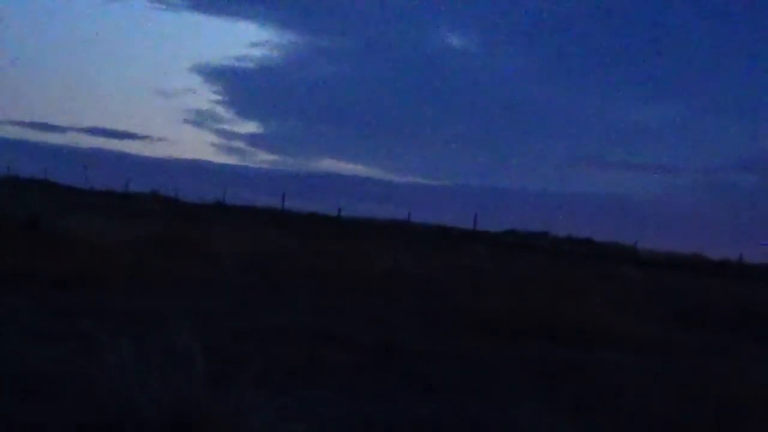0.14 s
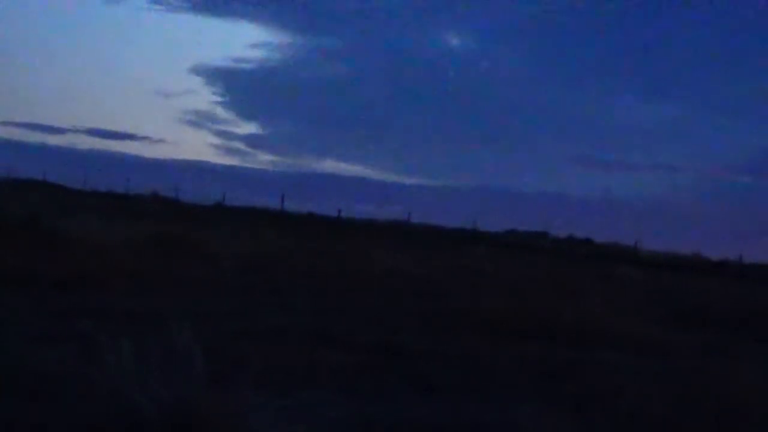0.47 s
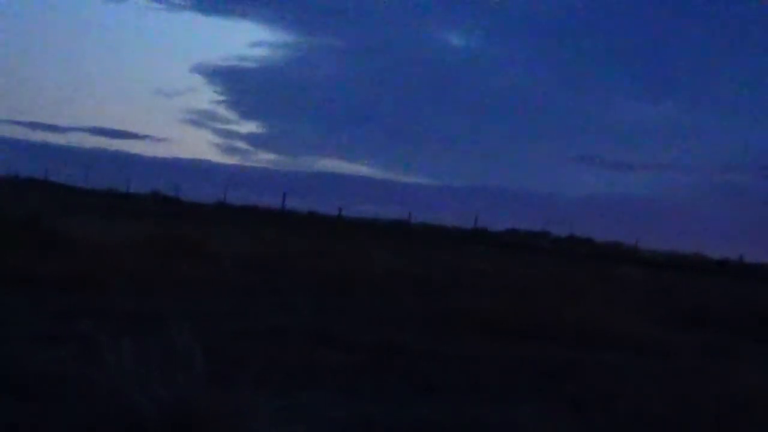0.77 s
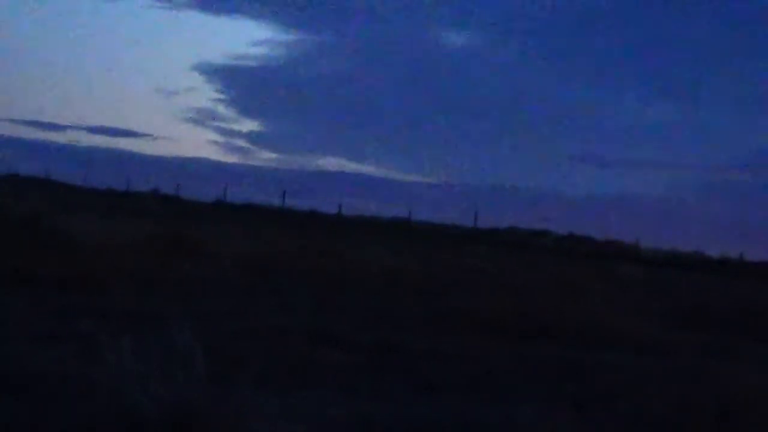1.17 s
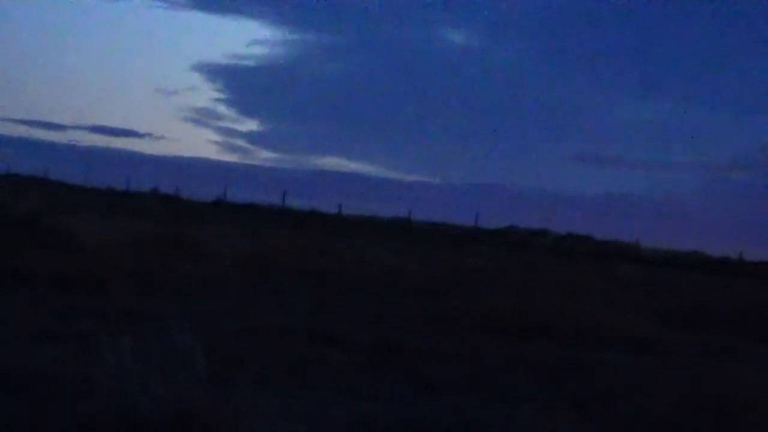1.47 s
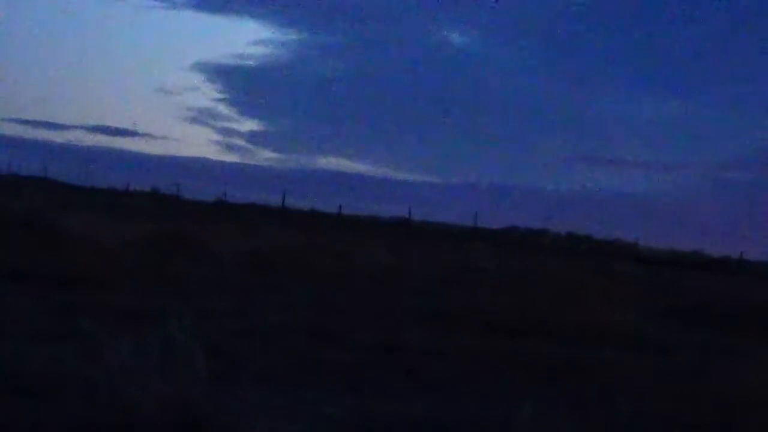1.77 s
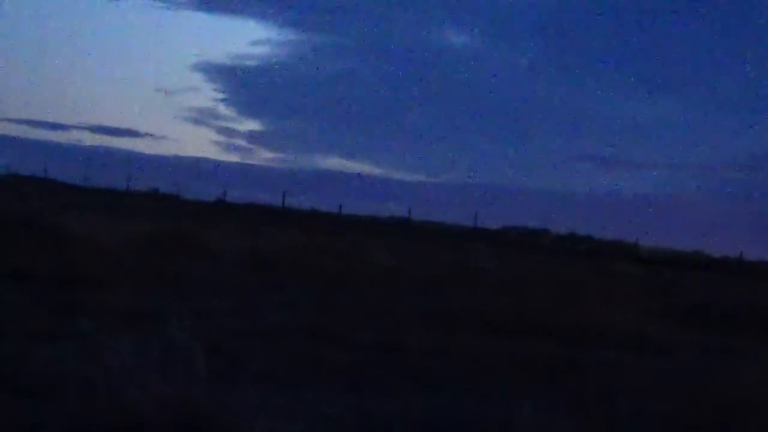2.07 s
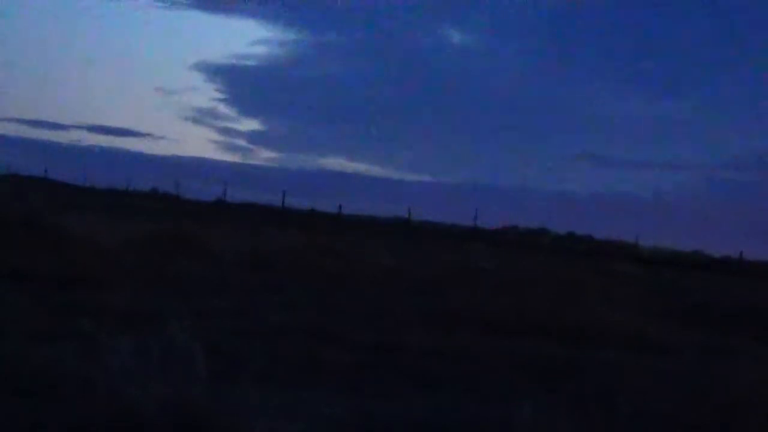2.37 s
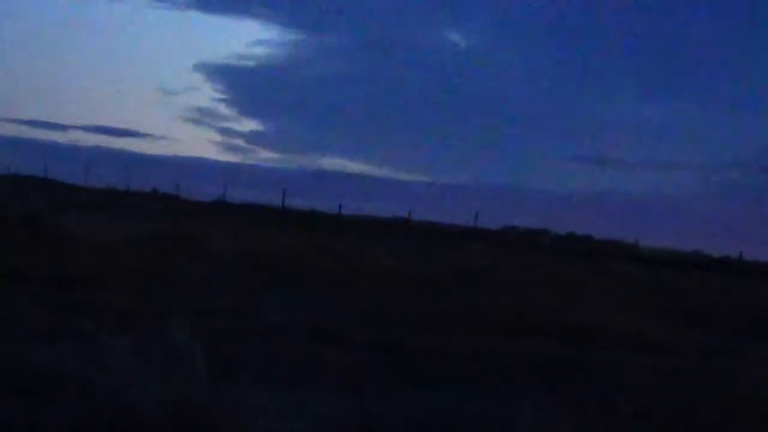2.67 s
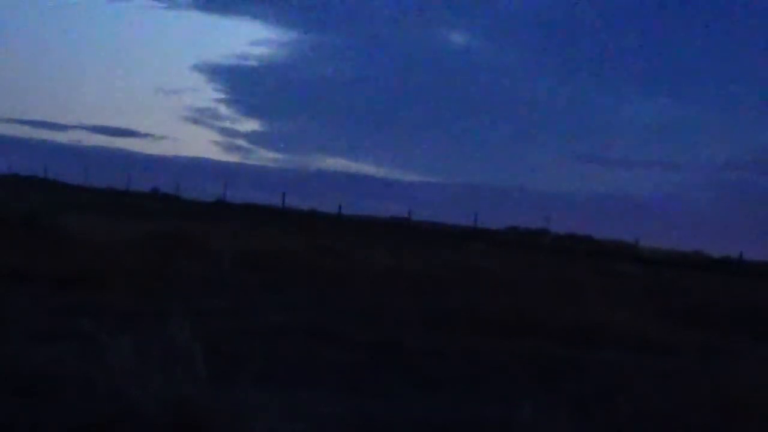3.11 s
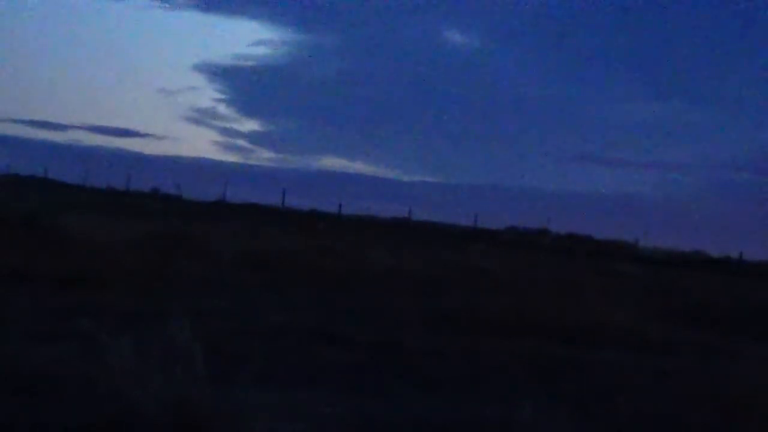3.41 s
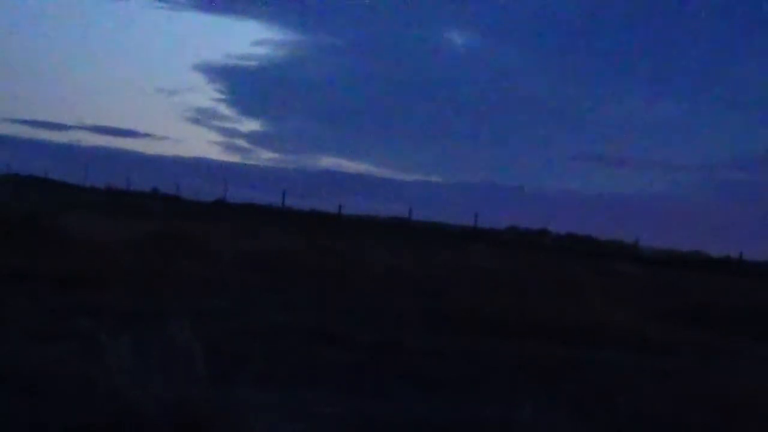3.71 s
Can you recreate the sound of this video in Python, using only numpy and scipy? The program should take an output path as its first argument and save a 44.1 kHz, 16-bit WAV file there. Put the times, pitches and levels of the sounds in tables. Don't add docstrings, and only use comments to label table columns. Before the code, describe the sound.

Coyotes yip and howl in short wavering cries across an open field, dry clicks close by.

```python
import sys
import numpy as np
from scipy import signal
from scipy.fft import rfft, irfft
from scipy.io import wavfile
from scipy.ndimage import uniform_filter1d

SR = 44100
rng = np.random.default_rng(int(sys.argv[2]) if len(sys.argv) > 2 else 0)


def voltage_ratio(level):
    return 10 ** (np.asarray(level, float) / 20)


def file_out(sig):
    cols = np.atleast_2d(sig).T
    lim = np.clip(cols, -1, 1)
    pcm = np.round(lim * 32767).astype(np.int16)
    wavfile.write(sys.argv[1], SR, pcm)


N = 169785


def evened(x):
    return x / np.sqrt(np.mean(x ** 2) + 1e-20)


def read(points, hz):
    f, value = np.transpose(points)
    return np.interp(np.log(hz + 1), np.log(f + 1), value)


def along(points, t):
    return np.interp(t, *np.transpose(points))


def add(mix, start_s, sound, side_db):
    part = mix[:, round(start_s * SR):][:, :sound.shape[-1]]
    lean = voltage_ratio(np.array([[side_db / 2], [-side_db / 2]]))
    part += sound[..., :part.shape[1]] * 2 * lean / lean.sum()


def drift(count, span_s):
    size = int(span_s * SR) + 1
    smooth = uniform_filter1d(rng.standard_normal(count), size)
    return evened(uniform_filter1d(smooth, size))


def ring(x, peaks):
    out = 0
    for hz, width_hz, db in peaks:
        r = np.exp(-np.pi * width_hz / SR)
        poles = [1, -2 * r * np.cos(2 * np.pi * hz / SR), r * r]
        out = out + voltage_ratio(db) * signal.lfilter([1 - r, 0, r - 1], poles, x)
    return out


def colour(x, points):
    hz = np.fft.rfftfreq(N, 1 / SR)
    gain_db = read(points, hz) - 60 * (hz < points[0][0] / 2)
    return irfft(rfft(x) * voltage_ratio(gain_db), N)


def glide(start_s, length_s, db, first_hz, last_hz):
    u = np.linspace(0, 1, int(length_s * SR))
    hz = (first_hz + (last_hz - first_hz) * u) * (1 + 0.011 * drift(len(u), 0.0089))
    tone = np.sin(2 * np.pi * np.cumsum(hz) / SR)
    return start_s, voltage_ratio(db) * 2 * np.sin(np.pi * u) * tone


def air():
    # (frequency [Hz], level [dB])
    hiss_spectrum = [(24, -62), (100, -27.5), (400, -8.5), (1730, -5), (4500, -15.5), (8060, -18.5),
                     (10900, -15), (11300, -56)]
    # (frequency [Hz], left over right [dB])
    side_lean = [(60, -11.5), (850, 6), (12100, -0.5)]
    hz = np.fft.rfftfreq(N, 1 / SR)
    a, b = rfft(colour(rng.standard_normal((2, N)), hiss_spectrum))
    same = np.clip(0.89 - 0.17 * np.log(1 + hz / 200), 0, 1)
    lean = voltage_ratio(read(side_lean, hz) / 2)
    left = a * lean
    right = (same * a + np.sqrt(1 - same ** 2) * b) / lean
    return voltage_ratio(-54 + 1.7 * drift(N, 0.027)) * evened(irfft([left, right], N))


def wind():
    # (time [s], level [dB])
    wind_level = [(0, -55.5), (.1, -66), (.3, -66), (.48, -60), (.9, -88), (1.2, -80), (1.3, -59),
                  (1.39, -48.5), (1.5, -61), (1.64, -67), (1.86, -59), (2.1, -70.5), (2.33, -59.5),
                  (2.48, -75.5), (2.7, -60), (2.85, -74), (3.85, -75)]
    # (frequency [Hz], level [dB])
    gust_spectrum = [(30, -15), (140, -6), (450, -16)]
    # (time [s], length [s], level [dB], first pitch [Hz], last pitch [Hz])
    puff_rows = [
        (0.126, .03, -66, 110, 90),
        (0.202, .016, -54, 324, 290),
        (0.551, 0.013, -56.5, 483, 463),
        (1.39, 0.027, -48, 150, 131),
        (1.454, 0.015, -49, 200, 171),
        (1.676, 0.03, -55, 170, 110),
        (3.746, 0.013, -56, 450, 400),
    ]
    z = rng.standard_normal((3, N))
    both = z[:1] + 0.53 * z[1:]
    level = voltage_ratio(along(wind_level, np.arange(N) / SR) + 4.04 * drift(N, 0.028) - 2.0)
    out = evened(colour(both, gust_spectrum + [(1200, -45)])) * level
    for row in puff_rows:
        add(out, *glide(*row), side_db=0)
    return out


def rustle():
    # (time [s], level [dB])
    rustle_level = [(0, -78), (.3, -59.5), (.35, -49.5), (.4, -56.5), (.5, -49), (.6, -75), (1.15, -63.5),
                    (1.72, -75.5), (1.82, -48.5), (1.94, -50), (2.01, -56.5), (2.12, -52.5), (2.32, -52),
                    (2.48, -64), (3.25, -81), (3.42, -58.5), (3.85, -67.5)]
    # (frequency [Hz], level [dB])
    grass_spectrum = [(600, -15), (1200, 0), (2800, -2.5), (4800, -8.5), (7000, -4.5), (10800, -14.5),
                      (11300, -49)]
    cracks_per_s, spread_db, decay_s = 1100, 3, 0.00081
    size = voltage_ratio(spread_db * np.minimum(rng.exponential(1, N), 4))
    size = size * (rng.random(N) < cracks_per_s / SR)
    envelope = np.sqrt(signal.lfilter([1], [1, -np.exp(-1 / (decay_s * SR))], size ** 2))
    grain = rng.standard_normal((3, N))
    both = envelope * (grain[:1] + .5 * grain[1:])
    level = voltage_ratio(along(rustle_level, np.arange(N) / SR) + 6 + 2.84 * drift(N, 0.023))
    return evened(colour(both, grass_spectrum)) * level * voltage_ratio(np.array([[1.5], [-1.5]]))


def clicks(rows, body, burst_s, gain_db, tail_db, lean_db, low_hz):
    # (centre [Hz], width [Hz], level [dB])
    hollow_peaks = [(1102, 77, 1)]
    out = np.zeros((2, N))
    t = np.arange(2500) / SR - .0008
    high_pass = signal.butter(3, low_hz, "high", fs=SR, output="sos")
    for start_s, db, *ring_db in rows:
        z = rng.standard_normal((3, len(t)))
        decay = np.exp(-t / burst_s) + voltage_ratio(tail_db) * np.exp(-t / 0.0076)
        burst = (z[0] + 0.56 * z[1:]) * decay * (t > 0)
        burst[:, np.argmax(t > 0)] += 4
        spot = 1 + np.array([.07, 0, .15]) * rng.standard_normal((len(body), 3))
        sound = signal.sosfilt(high_pass, ring(burst, np.array(body) * spot))
        sound = sound / abs(sound).max()
        if ring_db:
            hollow = ring(burst, hollow_peaks)
            sound = uniform_filter1d(sound, size=5) + voltage_ratio(ring_db[0]) * hollow / abs(hollow).max()
        add(out, start_s, voltage_ratio(db + gain_db) * sound, lean_db)
    return out


def ticks():
    # (time [s], peak [dB])
    tick_rows = [(.0438, -44), (.6708, -33.5), (1.0917, -23.5), (1.255, -42), (1.3823, -43), (1.3905, -35),
                 (1.5796, -31.5), (1.7916, -17.5), (1.7968, -28), (1.801, -22), (1.824, -35),
                 (1.837, -26.5), (1.8456, -28), (1.893, -39), (1.926, -12), (2.0322, -30.5), (2.0631, -38),
                 (2.0848, -27.5), (2.1175, -31.5), (2.1816, -26), (2.2088, -42), (2.2861, -33),
                 (2.345, -44), (2.3859, -42), (2.4128, -48), (2.8291, -38), (3.1199, -47)]
    # (centre [Hz], width [Hz], level [dB])
    tick_body = [(1540, 540, 7.5), (2920, 1500, 7), (4160, 760, 7), (6800, 4400, -14.5)]
    return clicks(tick_rows, tick_body, burst_s=0.00016, gain_db=5.0, tail_db=-13,
                  lean_db=7.5, low_hz=900)


def snaps():
    # (time [s], peak [dB])
    snap_rows = [(.3183, -13), (.3322, -24), (.3362, -28), (.3495, -28), (.367, -27), (.4232, -31),
                 (.4266, -12), (.4483, -28), (.4508, -22), (.4592, -11), (.4672, -20), (.4705, -28),
                 (.4749, -11), (.478, -20), (.484, -13)]
    # (centre [Hz], width [Hz], level [dB])
    snap_body = [(500, 45, 22.5), (1250, 1160, 4), (2720, 510, 9.5), (6000, 3000, 4.5), (7700, 12000, -2)]
    return clicks(snap_rows, snap_body, burst_s=0.00082, gain_db=3.5, tail_db=-23.0,
                  lean_db=-2.5, low_hz=900)


def knocks():
    # (time [s], peak [dB], hollow ring [dB])
    knock_rows = [
        (3.4375, -9, -12),
        (3.453, -40, 10),
        (3.4735, -36, 7),
        (3.483, -58, 30),
    ]
    # (centre [Hz], width [Hz], level [dB])
    knock_body = [(1350, 580, 8), (2450, 990, -2), (3930, 580, -3)]
    return clicks(knock_rows, knock_body, burst_s=0.00055, gain_db=3.4, tail_db=-14,
                  lean_db=6.5, low_hz=358)


def bark(start_s, length_s, db, throat):
    pitch_hz, rough = 327.7, 0.72
    u = np.linspace(0, 1, int(length_s * SR))
    turns = np.cumsum(pitch_hz * (1 + 0.062 * drift(len(u), 0.0063))) / SR
    pulses = evened(np.diff(turns // 1, prepend=0))
    breath = rng.standard_normal(len(u)) * np.exp(-(turns % 1) / 1.07)
    drive = (1 - rough) * pulses + rough * breath
    voice = evened(ring(ring(drive, throat), throat))
    return start_s, voltage_ratio(db) * voice * np.sin(np.pi * u ** 0.67) * 2.78


def far_voices():
    # (time [s], length [s], level [dB], first pitch [Hz], last pitch [Hz])
    yip_rows = [
        (0.219, 0.029, -53.5, 2620, 2800),
        (0.237, 0.02, -56.5, 3000, 3250),
        (0.257, 0.05, -56, 1980, 1860),
        (0.728, 0.028, -50, 2161, 1710),
        (1.6, 0.025, -45, 2070, 1930),
        (2.45, 0.061, -47, 1430, 1227),
        (2.433, 0.07, -52, 2360, 2124),
        (3.189, 0.28, -64, 640, 606),
        (3.658, 0.016, -59, 960, 900),
        (3.727, .04, -66, 3910, 3900),
    ]
    # (time [s], length [s], level [dB])
    bark_rows = [
        (1.038, .05, -62),
        (1.119, 0.033, -49.5),
        (1.142, 0.023, -50),
        (1.161, 0.02, -48.5),
        (1.18, 0.062, -55),
        (2.631, 0.044, -58),
        (3.045, 0.042, -59),
        (3.08, 0.047, -54.5),
        (3.19, 0.11, -60.5),
        (3.33, 0.16, -57.5),
    ]
    # (centre [Hz], width [Hz], level [dB])
    bark_throat = [(1480, 400, 0), (2130, 380, -1)]
    out = np.zeros((2, N))
    for row in yip_rows:
        add(out, *glide(*row), side_db=11)
    for row in bark_rows:
        add(out, *bark(*row, bark_throat), side_db=11)
    return out


def howl(rows):
    third_level = [(2.2, -21), (2.9, -12.5), (3.6, -10)]
    throat_top_hz, cut_db_per_hz, edge_s = 3860, 0.2, 0.0045
    s, hz, second_db, first_db = np.transpose(rows)
    t = np.arange(s[0], s[-1], 1 / SR)
    pitch_hz = np.interp(t, s, hz) * (1 + 0.0044 * drift(len(t), 0.009))
    phase = 2 * np.pi * np.cumsum(pitch_hz) / SR
    first = np.interp(t, s, first_db)
    second = np.interp(t, s, second_db)
    third = second + along(third_level, t) - cut_db_per_hz * np.maximum(3 * pitch_hz - throat_top_hz, 0)
    tone = 0
    for k, db in enumerate((first, second, third), start=1):
        flutter_db = 2 * drift(len(t), 0.0096)
        tone = tone + voltage_ratio(db + flutter_db) * np.sin(k * phase)
    fade = np.clip(np.minimum(t - s[0], s[-1] - t) / edge_s, 0, 1)
    return s[0], np.sqrt(2) * tone * fade


def howls():
    # (time [s], pitch [Hz], second partial [dB], first partial [dB])
    howl_a = [
        [(.3, 1459, -57, -70), (.33, 1530, -44, -50), (.38, 1775, -44.5, -46), (.43, 1709, -46, -44.5),
         (.445, 1720, -46.5, -49), (.495, 1706, -43, -56)],
        [(.495, 1670, -43, -66), (.515, 1507, -43, -66), (.555, 1717, -41, -54.5), (.575, 1563, -39, -59),
         (.62, 1607, -49, -47.5), (.648, 1743, -39, -45.5), (.68, 1707, -37.5, -43), (.72, 1800, -44, -47.5),
         (.75, 1960, -82, -51)],
    ]
    howl_b = [
        [(.965, 1200, -65, -68), (.98, 1400, -55, -57), (.995, 1750, -47.5, -51.5), (1.015, 1880, -68, -67),
         (1.055, 1790, -49, -65), (1.08, 1830, -58, -54), (1.13, 1920, -58, -49)],
        [(1.21, 1820, -47.5, -68), (1.235, 1830, -58, -72), (1.27, 1880, -73, -62), (1.31, 1825, -51.5, -62),
         (1.33, 1740, -38, -55), (1.347, 1720, -50, -51)],
    ]
    howl_c = [
        [(1.525, 1133, -64, -68), (1.56, 1330, -45, -69), (1.575, 1610, -47, -51), (1.6, 1680, -59, -66)],
        [(1.62, 1506, -49.5, -72), (1.66, 1602, -35.5, -54.5), (1.74, 1720, -40.5, -56),
         (1.81, 1786, -48.5, -70), (1.84, 1820, -66, -53), (1.895, 1740, -44, -51)],
    ]
    howl_d = [
        [(2.105, 1002, -44.5, -62), (2.15, 1204, -38.5, -49.5), (2.185, 1290, -58, -53), (2.2, 1350, -42, -49),
         (2.228, 1441, -43.5, -54), (2.24, 1618, -40, -54), (2.275, 1786, -41.5, -47), (2.31, 1880, -68, -52)],
        [(2.315, 1750, -51, -59), (2.35, 1656, -38.5, -47.5), (2.43, 1711, -38.5, -49.5),
         (2.48, 1741, -36.5, -54), (2.51, 1755, -42, -58), (2.555, 1795, -40, -46), (2.6, 1740, -32.5, -45.5),
         (2.635, 1659, -37.5, -47.5), (2.657, 1560, -40.5, -48)],
    ]
    howl_e = [
        [(2.865, 1096, -63, -76), (2.895, 1150, -38.5, -78), (2.915, 1287, -47, -71), (2.97, 1216, -45.5, -60),
         (3.02, 1312, -42, -55), (3.045, 1403, -36, -47), (3.074, 1443, -37, -47)],
        [(3.066, 1490, -40, -46), (3.085, 1544, -37, -50), (3.15, 1498, -37.5, -51.5),
         (3.205, 1565, -44.5, -50), (3.27, 1491, -43.5, -54)],
    ]
    yodel = [
        [(3.52, 1026, -53.5, -52), (3.56, 1180, -33.5, -63), (3.588, 1250, -59, -66)],
        [(3.58, 1690, -44, -45), (3.615, 1570, -60.5, -54), (3.638, 1600, -43, -44)],
        [(3.632, 1189, -42.5, -61), (3.695, 1408, -37.5, -62), (3.75, 1300, -47, -56.5),
         (3.85, 1328, -40, -63.5)],
    ]
    # (centre [Hz], width [Hz], level [dB])
    rasp_throat = [(3330, 410, 0)]
    out = np.zeros((2, N))
    for rows in howl_a + howl_b + howl_c + howl_d + howl_e + yodel:
        add(out, *howl(rows), side_db=12)
    rasp = bark(start_s=1.355, length_s=0.074, db=-56, throat=rasp_throat)
    add(out, *rasp, side_db=12)
    return out


def field(x):
    t = np.arange(SR) / SR
    sparse = rng.standard_normal((2, SR)) * (rng.random((2, SR)) < .05)
    taps = sparse * voltage_ratio(-60 * t / .6) * (t > .01)
    return signal.fftconvolve(x, taps / np.linalg.norm(taps[0]), axes=1)[:, :N]


def pack():
    out = far_voices() + howls()
    return out + voltage_ratio(-19) * field(out)


def scene():
    near = ticks() + snaps() + knocks()
    return air() + wind() + rustle() + near + pack()


def top_cut(x):
    return signal.sosfilt(signal.butter(12, 12680, fs=SR, output="sos"), x)


def record(dry):
    low_pass = signal.butter(11, 10140, fs=SR, output="sos")
    mix = signal.sosfilt(low_pass, dry)
    return top_cut(mix)


dry = scene()
out = record(dry)
file_out(out)
```